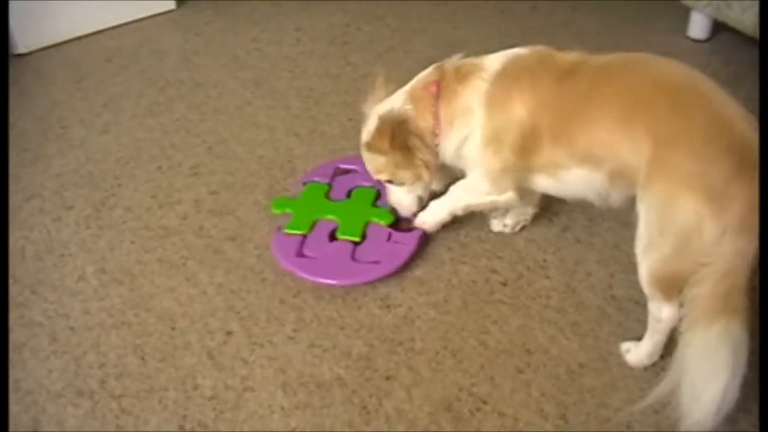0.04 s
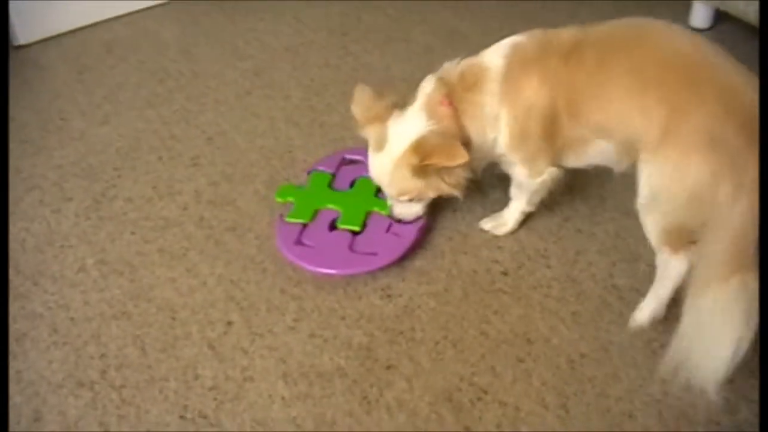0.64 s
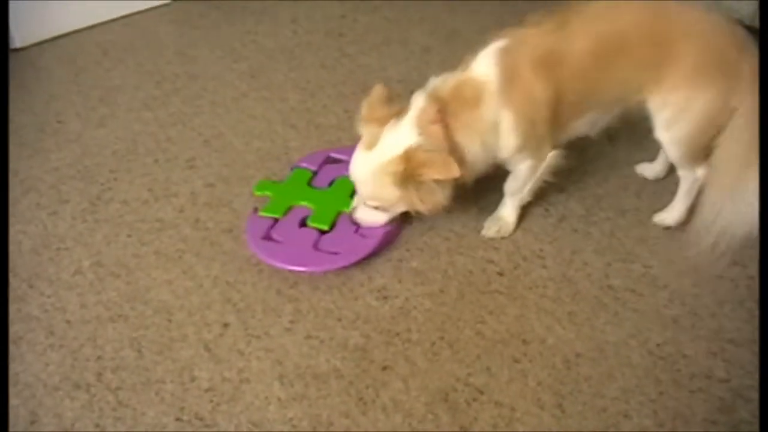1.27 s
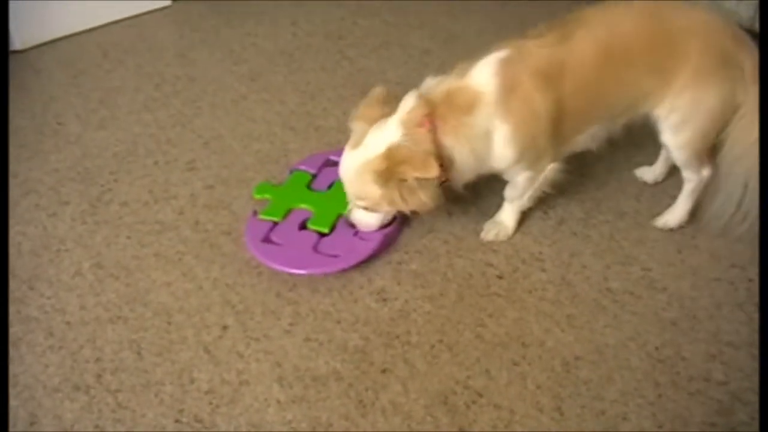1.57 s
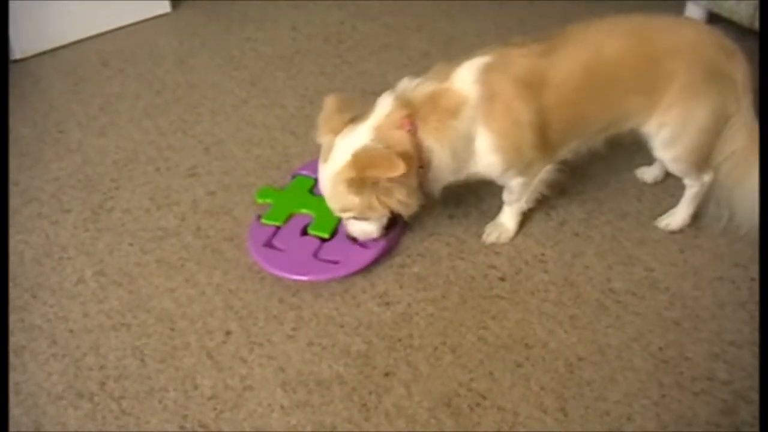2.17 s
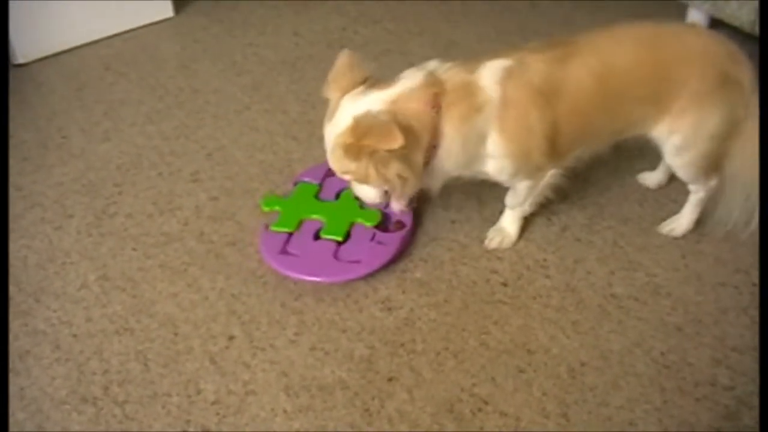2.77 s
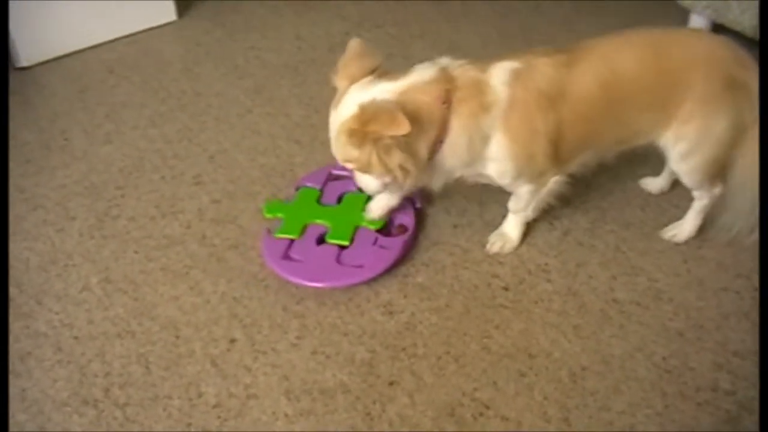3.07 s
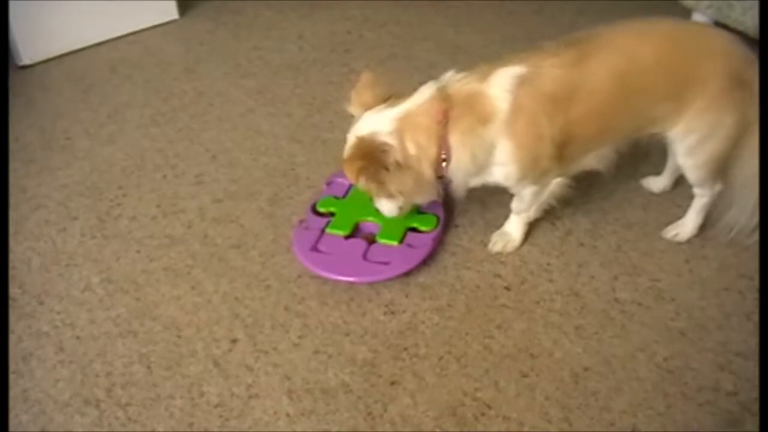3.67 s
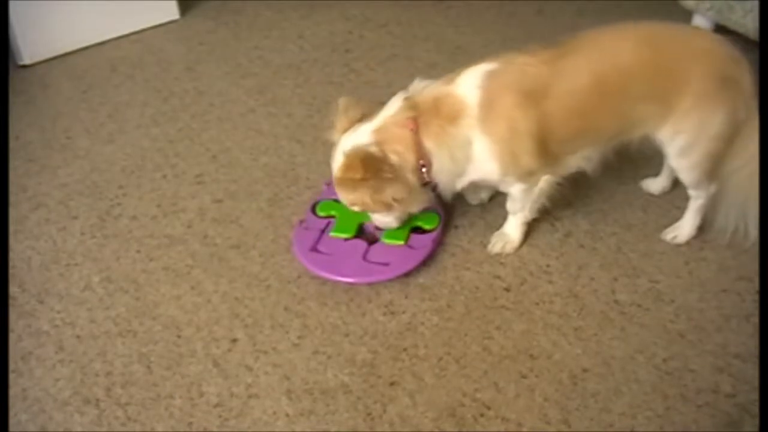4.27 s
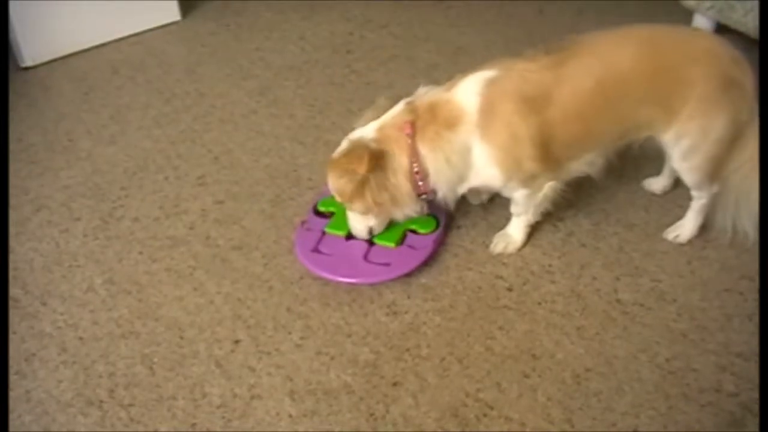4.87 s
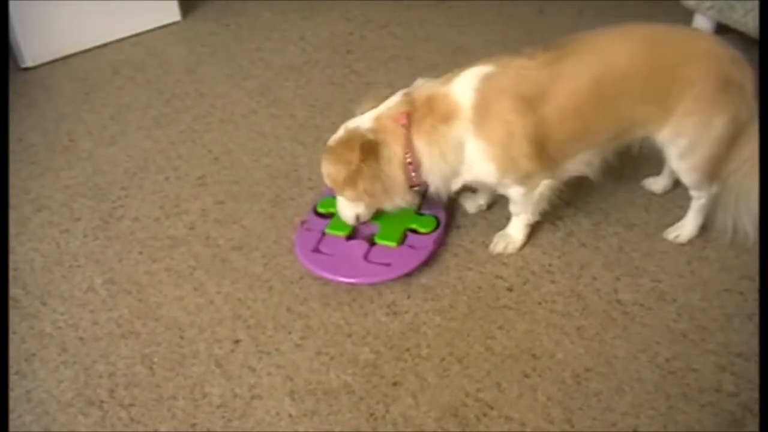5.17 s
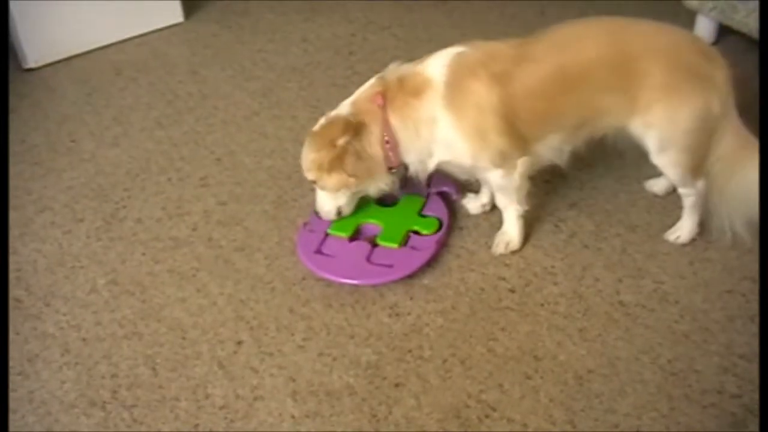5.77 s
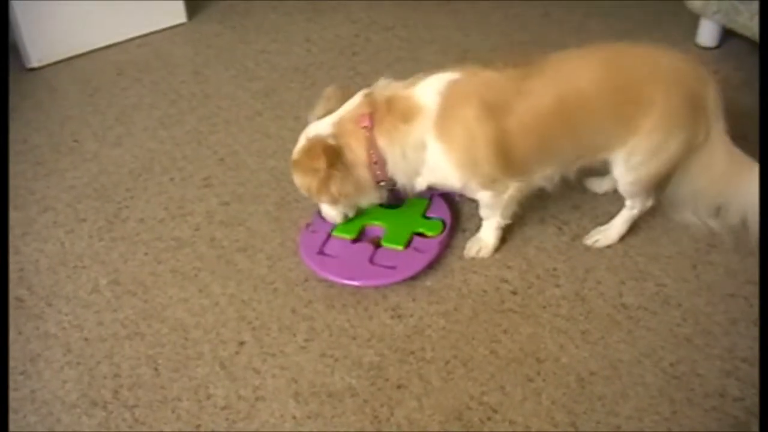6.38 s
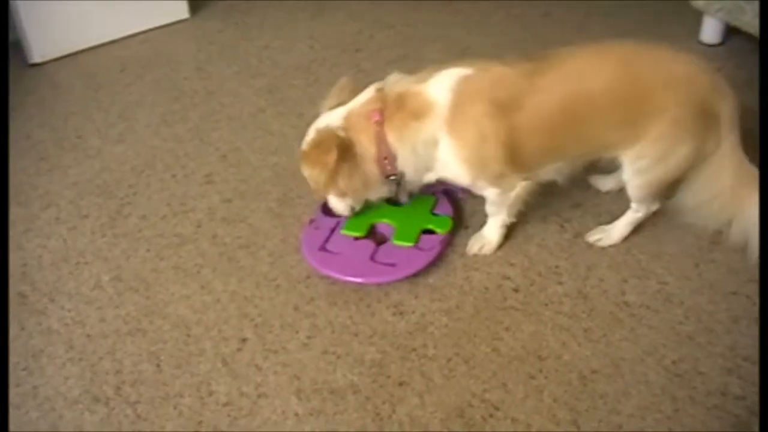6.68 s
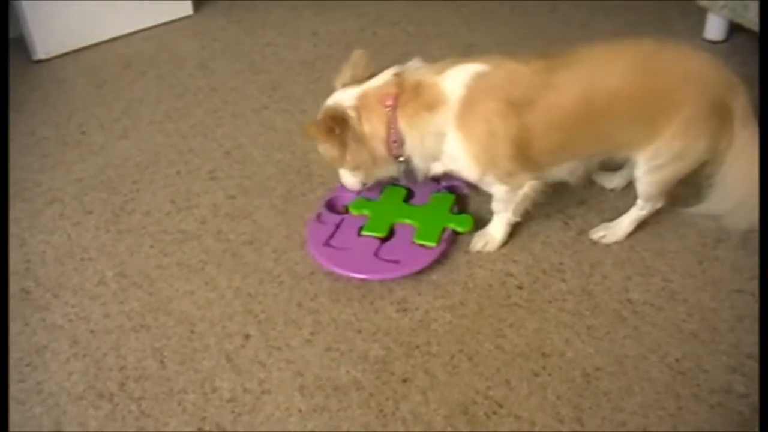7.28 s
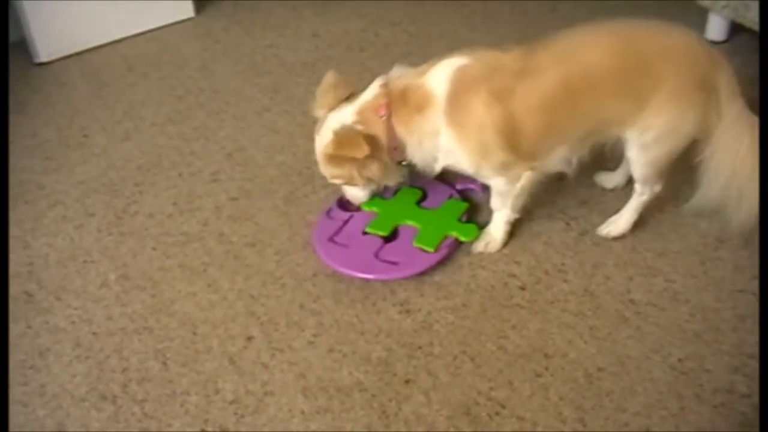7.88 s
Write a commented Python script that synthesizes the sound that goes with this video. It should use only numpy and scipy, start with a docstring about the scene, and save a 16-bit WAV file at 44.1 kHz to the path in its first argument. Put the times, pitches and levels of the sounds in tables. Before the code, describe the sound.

A small dog noses a plastic puzzle toy close to the microphone in a carpeted room. A few clicks and knocks give way to soft muzzle rustling, then a loud run of hollow clattering and short scrapes. A quieter stretch holds light nudges and tiny nose squeaks before sharp clicks and knocks return. An appliance hums faintly throughout.

```python
"""A carpeted living room, the microphone close to a plastic puzzle toy that a small dog is nosing.
The wet nose squeaks, the loose top piece clicks, and sliders scrape in their tracks and knock into
the hollow tray. The muzzle rustles and ticks over the plastic, the tongue nudges it, and a paw or
the rocking tray thuds on the carpet. The room answers briefly; behind it all an appliance hums faintly."""
import sys
import numpy as np
from scipy import signal
from scipy.fft import rfft, irfft, next_fast_len
from scipy.io import wavfile
from scipy.ndimage import map_coordinates

SR = 44100
rng = np.random.default_rng(int(sys.argv[2]) if len(sys.argv) > 2 else 0)


def waveform_to_disk(signal):
    """Save audio, clipped to [-1, 1], as 16-bit WAV at the path in sys.argv[1]."""
    frames = np.transpose(np.atleast_2d(signal))
    scaled = np.clip(frames, -1, 1) * 32767
    samples = np.round(scaled).astype(np.int16)
    wavfile.write(sys.argv[1], SR, samples)


N = 354123
SIZE = 16384  # samples in one short sound
T = np.arange(SIZE) / SR
HZ = np.fft.rfftfreq(SIZE, 1 / SR) + 1


def amp(db):
    """Decibels to gain."""
    return 10 ** (np.asarray(db) / 20)


def unit(x):
    """x at rms 1."""
    return x / np.sqrt(np.mean(x ** 2) + 1e-20)


def at_level(x, db):
    """Scale a short sound so that its mid energy equals db held for 20 ms."""
    return x * amp(db) / np.sqrt(np.sum(x[0] ** 2) / (SR / 50))


def along(points, hz):
    """(frequency, value) points read on a log axis."""
    freqs, values = np.transpose(points)
    return np.interp(np.log(hz + 1), np.log(freqs), values)


def fade(t60, t=T):
    """Exponential decay by 60 dB in t60 seconds."""
    return np.exp(-np.log(1000) * t / np.maximum(t60, .002))


def wobble(rate, size=SIZE):
    """A smooth random curve with rate knots a second."""
    knots = rng.standard_normal(int(size * rate / SR) + 4)
    return map_coordinates(knots, [np.arange(size) * rate / SR])


def peak(hz, width):
    """Gain of one steep-sided resonance."""
    return 1 / (1 + ((HZ ** 2 - hz ** 2) / (HZ * width)) ** 2)


def filtered(x, gain):
    """A whole track times a gain over frequency."""
    size = next_fast_len(N + SIZE)
    return irfft(rfft(x, size) * gain(np.fft.rfftfreq(size, 1 / SR)), size)[..., :N]


def ring(x, gain):
    """x through a causal (minimum-phase) body with this gain over frequency."""
    cepstrum = irfft(np.log(np.maximum(gain, 1e-5)))
    cepstrum[1:SIZE // 2] *= 2
    cepstrum[SIZE // 2 + 1:] = 0
    return irfft(rfft(x) * np.exp(rfft(cepstrum)))


def grit(spread_db):
    """Mid and side force of many tiny contacts of uneven size."""
    sizes = amp(spread_db * wobble(900))
    return rng.standard_normal((2, SIZE)) * sizes * amp([[0], [-15]])


def stroke(length, body, spread_db, judder_db):
    """Stick-slip friction through a body, with the energy of rms 1 held for length seconds."""
    gate = np.clip(T / 0.0055, 0, 1) * np.clip((length - T) / 0.04 + .5, 0, 1)
    force = grit(spread_db) * gate * amp(judder_db * wobble(112.6))
    friction = ring(force, body)
    return friction / np.sqrt(np.sum(friction[0] ** 2) / (length * SR))


# The living room's decay: (frequency [Hz], t60 [s])
ROOM_DECAY = [(200, 0.68), (530, 0.48), (1400, 0.44), (3700, 0.3), (10000, 0.28)]
def place(track, start, x, wet_db):
    """A mid/side sound reaches the microphone at start seconds, followed by the room's short answer."""
    hz, t, noise = signal.stft(rng.standard_normal((2, SIZE)), SR, nperseg=256)
    decay = fade(along(ROOM_DECAY, hz)[:, None], t)
    build_up = 1 - np.exp(-t / 0.0014)
    tail = signal.istft(noise * decay * build_up, SR, nperseg=256)[1]
    tail = tail / np.linalg.norm(tail[0]) * amp([[wet_db], [wet_db - 8]])
    heard = signal.fftconvolve(x[:1], tail, axes=1)
    heard[:, :SIZE] += x
    first = max(round(start * SR), 0)
    track[:, first:first + heard.shape[1]] += heard[:, :max(N - first, 0)]


# Room tone at the microphone: (frequency [Hz], relative density [dB])
ROOM_TONE = [(15, -52.5), (25, -22), (53, -14.5), (157, 0), (363, -4.5), (489, -20), (607, -9), (887, -7.5),
             (1230, -20), (1400, -13), (2350, -21.5), (3720, -23.5), (12200, -39.5), (16000, -41.5)]
def room_tone():
    """Steady low noise from all around, nearly as strong in the side as in the middle."""
    mid, side = filtered(rng.standard_normal((2, N)), lambda hz: amp(along(ROOM_TONE, hz)))
    return np.array([amp(-53) * unit(mid), amp(-55) * unit(side)])


# The appliance's upper tone, in the background: (time [s], level [dB])
HUM_LEVELS = [(0.0, -52), (0.47, -56), (0.83, -69.5), (1.72, -52.5), (2.82, -72), (3.47, -51.5),
              (3.87, -65), (4.09, -67.5), (4.29, -57), (5.46, -52), (6.28, -55), (6.69, -58.5), (7.72, -55),
              (8.03, -59.5)]
def appliance():
    """A wavering hum near 160 Hz swells and sinks over a fainter 100 Hz drone, both dead centre."""
    t = np.arange(N) / SR
    times, levels = np.transpose(HUM_LEVELS)
    phase = 2 * np.pi * np.cumsum(159.8 + .6 * wobble(2, N)) / SR
    hum = amp(np.interp(t, times, levels) + 2.96 + 0.98 * wobble(5, N)) * np.sin(phase)
    drone = amp(-63.5 + 1.3 * wobble(3.2, N)) * np.sin(2 * np.pi * 100 * t)
    return np.array([hum + drone, np.zeros(N)])


# Wet nose on plastic: (time [s], length [s], level [dB], pitch [Hz])
NOSE_SQUEAKS = [(0.036, 0.036, -44, 1960), (4.785, 0.0091, -49, 1780), (5.892, 0.025, -43, 1760),
                (6.054, .03, -55, 1620)]
def squeaks():
    """The nose sticks and slips, singing in one narrow resonance."""
    track = np.zeros((2, N))
    for start, length, db, hz in NOSE_SQUEAKS:
        squeak = stroke(length, peak(hz, width=hz * 0.2), spread_db=0, judder_db=4.5)
        place(track, start, amp(db) * squeak, wet_db=-9)
    return track


# Resonances of the toy's tray: (frequency [Hz], width [Hz], level [dB])
TRAY_MODES = [(310, 160, -16.5), (402.5, 64, -11.5), (661, 114, -2.5), (764, 120, -1.5), (930, 190, -1),
              (1108, 240, -3.5), (1210, 36, -12), (1377, 225, 0.5), (1631, 270, 0), (1754, 120, -5.5),
              (1910, 360, -4), (2160, 450, -4.5), (2466, 160, -7), (2950, 790, -5.5), (3157, 173, -7.5),
              (3610, 590, -3.5), (4430, 1200, -12), (4890, 1700, -13), (6070, 3860, -20.5),
              (10250, 7700, -24)]
def tray_body():
    """The hollow plastic tray's gain over frequency: its resonances add in power."""
    return np.sqrt(sum((amp(db) * peak(hz, width)) ** 2 for hz, width, db in TRAY_MODES))


# Hard edges snapping together: (time [s], level [dB], ring [Hz], relative treble [dB])
EDGE_CLICKS = [(0.1211, -17.5, 3080, -10), (0.153, -13.5, 3360, -37), (0.9952, -29, 2240, 5),
               (2.0826, -36, 4000, 3), (2.377, -21, 3740, -14), (2.4308, -18, 1840, 2),
               (2.8, -16, 1690, -6.5), (2.9107, -7.5, 1640, 0), (3.2009, -9, 1696, -5),
               (3.2068, -12.5, 1630, -21.5), (3.291, -9, 2884, -10), (3.6262, -9.5, 1606, -8.5),
               (4.2566, -28, 1850, -21.5), (4.657, -41.5, 2900, -25), (5.903, -33.5, 1810, -20.5),
               (6.1806, -31, 1810, -30), (6.6147, -15.5, 3870, -16.5), (6.803, -3, 3800, -10),
               (6.9084, -6, 3780, -16), (7.0046, -12, 3720, -22), (7.0264, -23, 1767, -8.5),
               (7.2113, -6, 2960, -15), (7.5334, -12, 3700, -13.5)]
def clicks(tray):
    """A loose piece catches and lets go: its stiff edge cracks, rings briefly and shakes the tray."""
    track = np.zeros((2, N))
    upper_tray = tray * HZ ** 2 / (HZ ** 2 + 2200 ** 2)
    for start, db, hz, treble_db in EDGE_CLICKS:
        force = grit(spread_db=3) * fade(0.034) * (1 - np.exp(-T / 0.00022))
        edge = at_level(ring(force, peak(hz, width=hz * .13)), db - 18.5)
        shell = at_level(ring(force, upper_tray), db - 17)
        crack = at_level(ring(force, peak(6500, width=8000)), db + treble_db - 14)
        place(track, start, edge + shell + crack, wet_db=-7)
    return track


# A slider eased along, alone or on its way to a blow: (time [s], length [s], level [dB])
SLIDER_PUSHES = [(0.165, 0.0737, -36), (1.3, 0.14, -60), (1.62, .14, -60.5), (2.184, .02, -40),
                 (2.44, 0.15, -36), (2.56, .02, -22), (2.81, .06, -38), (3.35, 0.17, -39),
                 (4.63, 0.041, -44), (5.0, 0.038, -51.5), (5.63, 0.052, -52), (5.86, 0.048, -48.5),
                 (6.02, .06, -51.5), (6.675, 0.056, -29), (6.785, 0.018, -26.5), (7.025, .04, -31.5),
                 (7.74, .25, -49)]
def slides(tray):
    """Sliders judder in their tracks, pushed or skidding after a knock; gentler strokes sound duller."""
    track = np.zeros((2, N))
    skids = [(start + .004, length, db - 17) for start, db, _, _, length in TRAY_KNOCKS if length > 0]
    for start, length, db in list(SLIDER_PUSHES) + skids:
        brightness_hz = 9000 * 2 ** ((db + 15.5) / 28)
        colour = tray / np.sqrt(2 + (HZ / brightness_hz) ** 2)
        scrape = stroke(length, colour, spread_db=5.5, judder_db=3)
        place(track, start, amp(db - 3) * scrape, wet_db=-3)
    return track


# Pieces striking the tray, close to the microphone:
# (time [s], level [dB], relative hollow [dB], relative treble [dB], skid length [s])
TRAY_KNOCKS = [(0.214, -23, -4.5, -24.5, 0.00046), (0.258, -4.5, -22, -25, 0.045),
               (0.4876, -18, -7, -28, 0.0076), (0.848, -41.5, -3.5, -32, 0.00068),
               (1.102, -22, -26, -13.5, 0.052), (1.119, -19.5, -24, -29.5, 0.0011),
               (1.784, -34.5, -9, -23.5, 0.064), (1.943, -30.5, -16.5, -17.5, 0.051),
               (1.989, -23.5, -14, -25.5, 0), (2.193, -21, -7.5, -19, 0.031),
               (2.208, -16.5, -19.5, -27.5, 0), (2.412, -14, -17, -23, 0.053),
               (2.574, -5, -19, -13, 0.00051), (2.585, 0, -28, -17, 0.061), (2.651, -10.5, -15, -18, .07),
               (2.722, -13.5, -24, -29.5, 0), (2.872, -2.5, -20, -15, .12), (2.991, -2, -23, -14.5, 0.046),
               (3.279, -1, -32, -14, 0.013), (3.334, -5.5, -19, -19.5, 0.0033),
               (3.497, -9, -19.5, -25.5, 0.099), (3.532, -3, -22.5, -22, .095),
               (3.617, -5.5, -20, -17, 0.051), (3.663, -7.5, -25, -25, 0),
               (4.2318, -23.5, -14, -31.5, 0.014), (5.161, -23.5, -12, -11.5, 0.044),
               (5.173, -12, -20, -22, 0.024), (6.425, -30.5, -13, -13, 0.11),
               (6.685, -7.5, -22.5, -21.5, 0.045), (6.8039, -8.5, -26, -10.5, 0.074),
               (7.059, -5, -26, -22.5, .03), (7.087, -0.5, -17.5, -9.5, 0.066),
               (7.213, -6, -21.5, -18.5, 0.066), (7.559, -12.5, -13, -34.5, 0.0082),
               (7.574, -1.5, -18.5, -20, 0.0036), (7.718, -17, -14, -23, .02), (7.829, -22, -19, -26.5, 0),
               (7.919, -19, -19.5, -23, 0)]
def knocks(tray):
    """Each piece grazes the wall, hits it and chatters; the hollow sounds longest, the treble shortest."""
    track = np.zeros((2, N))
    lead_s, graze_t60, chatter_t60 = .015, 0.012, 0.081
    hollow = 1 / (1 + (HZ / 1100) ** 6)
    treble = 1 / (1 + (6000 / HZ) ** 6)
    midrange = (1 - hollow) * (1 - treble)
    before, after = np.maximum(lead_s - T, 0), np.maximum(T - lead_s, 0)
    graze = fade(graze_t60, before) * np.where(before > 0, amp(-2), 1)  # rises into the blow
    chatter = fade(chatter_t60, after)
    treble_chatter = fade(chatter_t60 * 0.39, after)
    for start, db, hollow_db, treble_db, _ in TRAY_KNOCKS:
        force = grit(spread_db=3.5) * graze
        low = at_level(ring(force * np.sqrt(chatter), tray * hollow), db + hollow_db - 3)
        middle = at_level(ring(force * chatter, tray * midrange), db - 14.5)
        high = at_level(ring(force * treble_chatter, tray * treble), db + treble_db - 7)
        place(track, start - lead_s + .0007, low + middle + high, wet_db=-6)
    return track


def licks(tray, count=22):
    """Tongue and nose nudge the tray softly at random; some touches are dull, some wet and bright."""
    track = np.zeros((2, N))
    swell = (1 - np.exp(-T / .008)) * fade(.09)
    for when, size, brightness in rng.random((count, 3)):
        colour = tray * (HZ / 2000) ** (brightness - .5)
        touch = ring(grit(spread_db=1) * swell, colour)
        place(track, when * N / SR, at_level(touch, -61 + 7 * size), wet_db=-9.5)
    return track


# Fur on plastic, heard close: (frequency [Hz], relative level [dB])
FUR_SPECTRUM = [(300, -42), (1200, 5), (3500, 5), (7000, -1.5), (12000, -5), (16000, -12.5)]
# The muzzle's passes over the toy: (time [s], length [s], level [dB])
MUZZLE_RUBS = [(0.604, 0.24, -56.5), (0.89, 0.2, -49), (0.992, 0.13, -38.5), (1.541, 0.29, -56.5),
               (2.079, .035, -44.5), (4.621, 0.183, -62), (5.88, 0.5, -65), (6.339, 0.049, -48.5)]
def rubs():
    """Fur and whiskers drag over the plastic with a bright, crackly rustle."""
    track = np.zeros((2, N))
    fur = amp(along(FUR_SPECTRUM, HZ))
    for start, length, db in MUZZLE_RUBS:
        rustle = stroke(length, fur, spread_db=4, judder_db=-1)
        place(track, start, amp(db - 6) * rustle, wet_db=-12.5)
    return track


def ticks(per_second=12):
    """Teeth, whiskers and tongue make tiny bright ticks at random while the muzzle rubs."""
    track = np.zeros((2, N))
    for start, length, _ in MUZZLE_RUBS:
        for when, size, pitch in rng.random((round(per_second * length), 3)):
            force = grit(spread_db=2.5) * fade(.005)
            tick = ring(force, peak(4500 + 6000 * pitch, width=7000))
            place(track, start + when * length, at_level(tick, -73 + 9 * size), wet_db=-11.5)
    return track


# Short dull thuds on the carpet, from a paw or the rocking tray: (time [s], level [dB], centre [Hz])
CARPET_THUDS = [(1.783, -34.5, 254), (2.873, -32, 305), (2.993, -36.5, 202.5), (3.279, -39, 110),
                (3.532, -31.5, 258), (7.087, -24.5, 100.4)]
def thuds():
    """The carpet cushions each landing into a short dull push."""
    track = np.zeros((2, N))
    for start, db, hz in CARPET_THUDS:
        push = ring(grit(spread_db=1.5) * fade(0.047), peak(hz, width=140))
        place(track, start, at_level(push, db - 7.5), wet_db=-22.5)
    return track


# Stereo width at the microphone: (frequency [Hz], side gain [dB])
STEREO_WIDTH = [(30, -7), (250, -10), (1000, -3), (4000, -0.5), (12000, 2)]
def scene():
    """The toy lies straight ahead: most of its sound is in the middle, and the treble spreads widest."""
    tray = tray_body()
    play = knocks(tray) + clicks(tray) + licks(tray) + ticks() + squeaks()
    play += slides(tray) + rubs() + thuds()
    mid, side = play + room_tone() + appliance()
    side = filtered(side, lambda hz: amp(along(STEREO_WIDTH, hz)))
    return np.array([mid + side, mid - side])


def record(dry):
    """The camera's microphone softens the top octave, rounds the highest peaks and stops at 16 kHz."""
    soft = filtered(dry, lambda hz: 1 / np.sqrt(1 + (hz / 13500) ** 8))
    rounded = soft / (1 + np.abs(soft) ** 6) ** (1 / 6)
    return filtered(rounded, lambda hz: hz < 16000)


dry = scene()
out = record(dry)
waveform_to_disk(out)
```